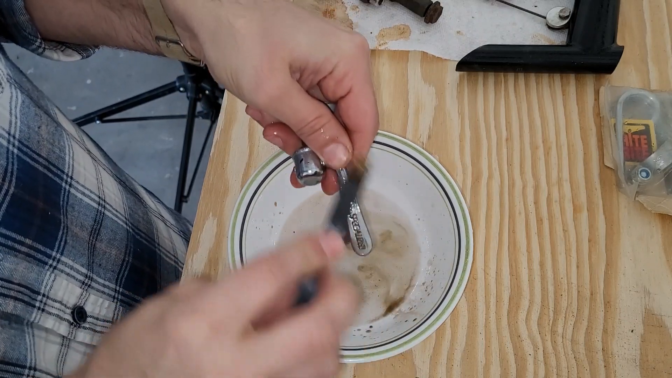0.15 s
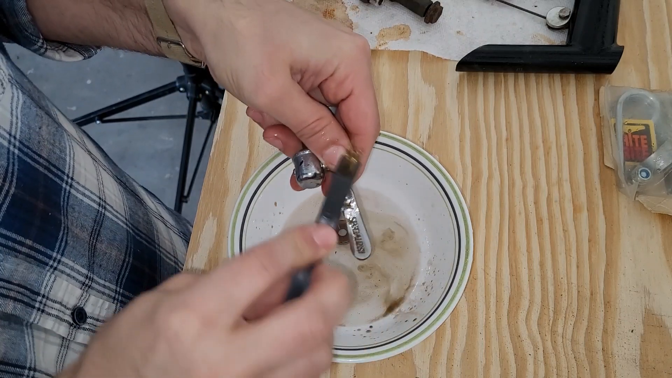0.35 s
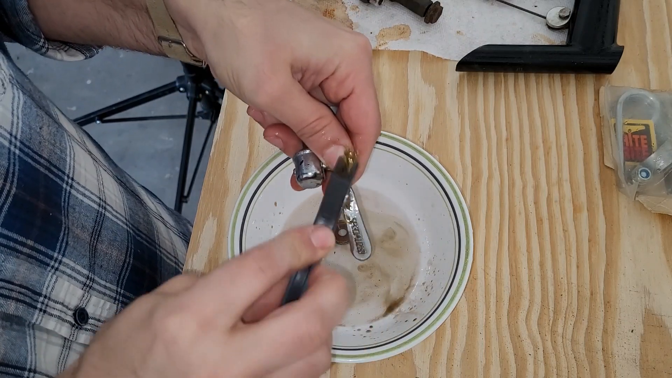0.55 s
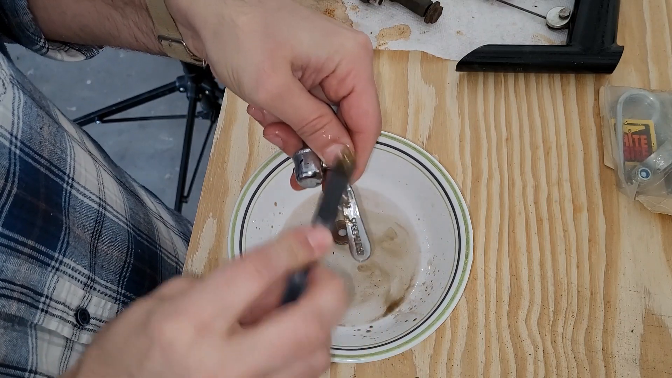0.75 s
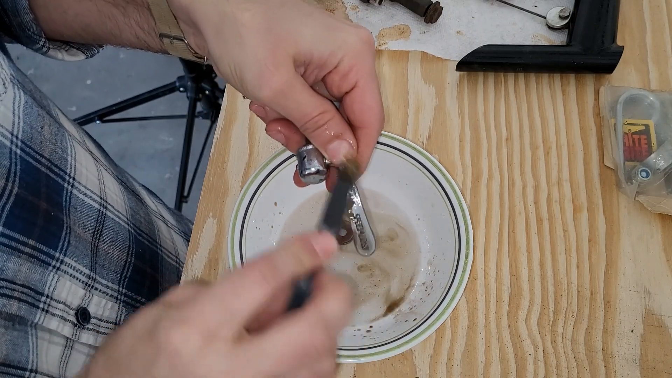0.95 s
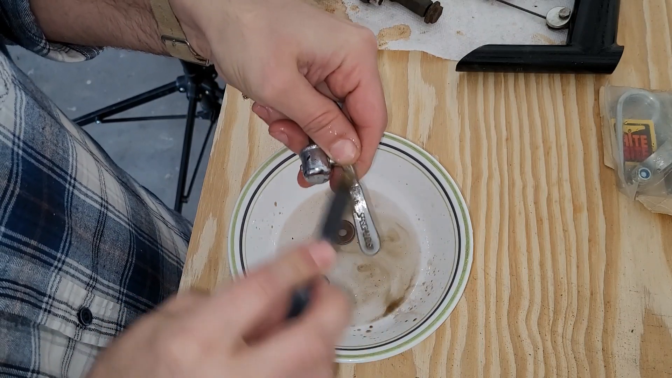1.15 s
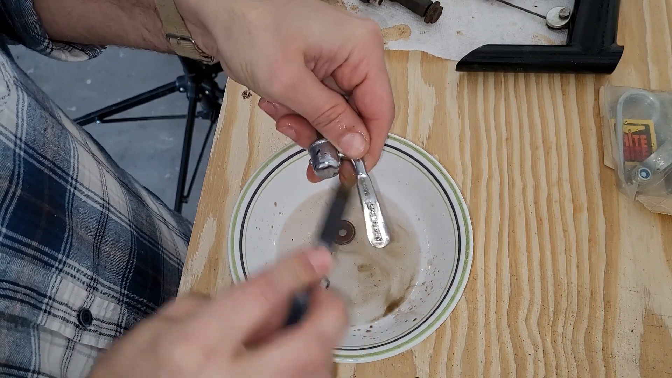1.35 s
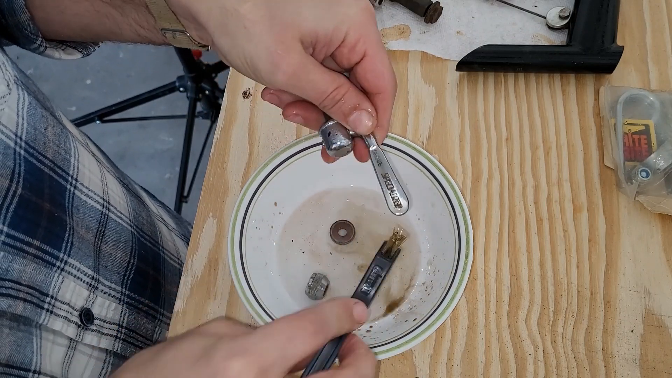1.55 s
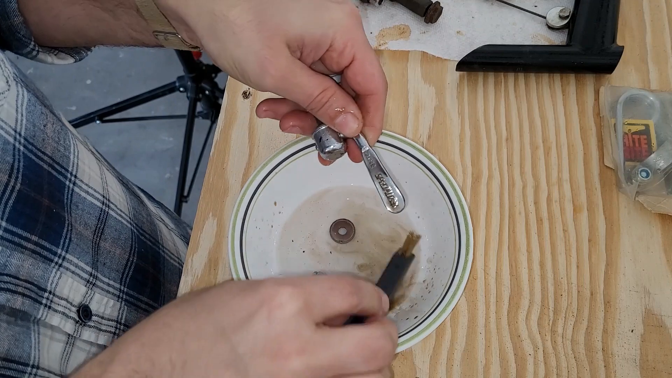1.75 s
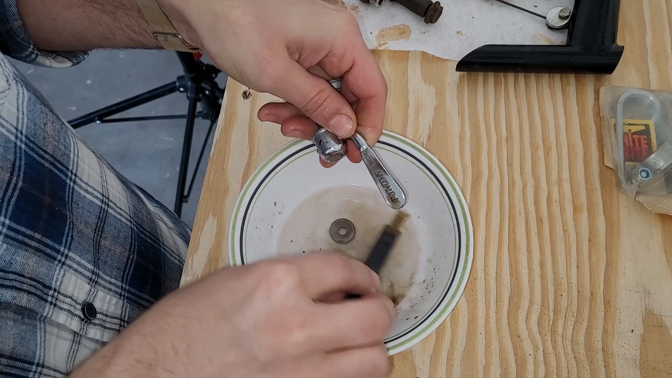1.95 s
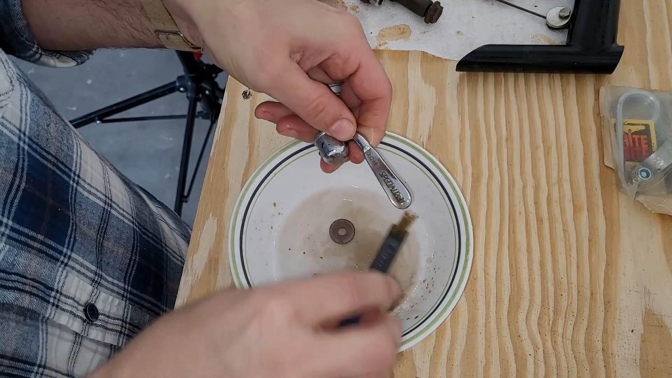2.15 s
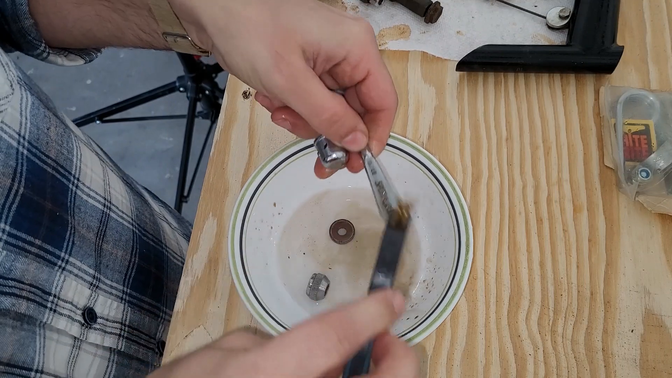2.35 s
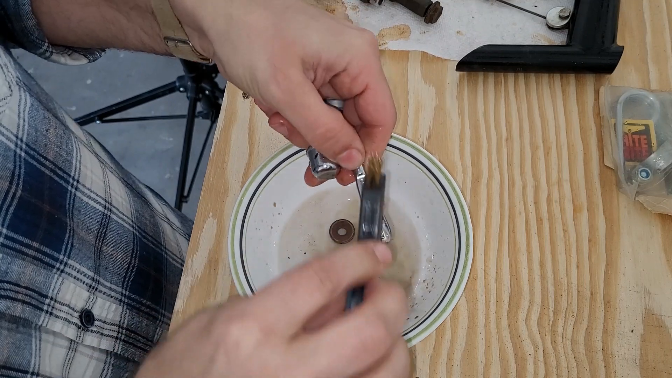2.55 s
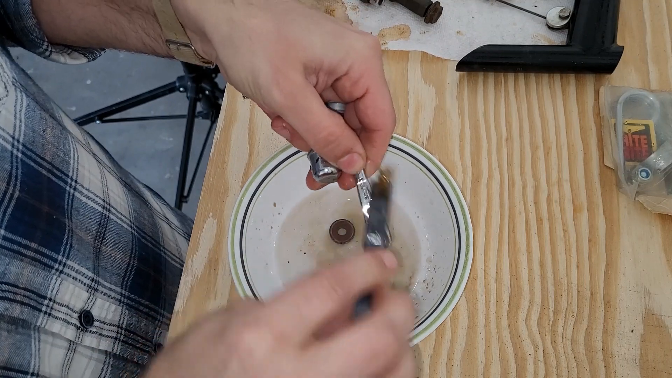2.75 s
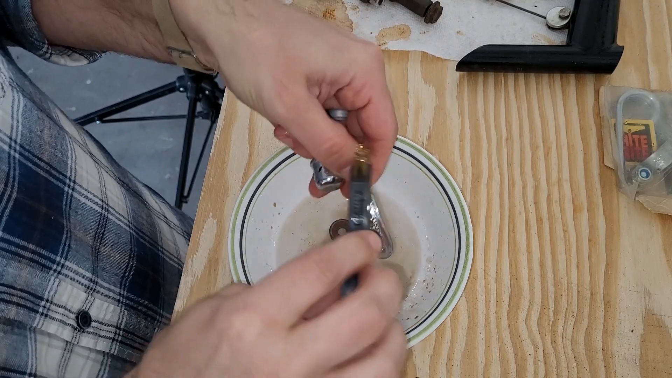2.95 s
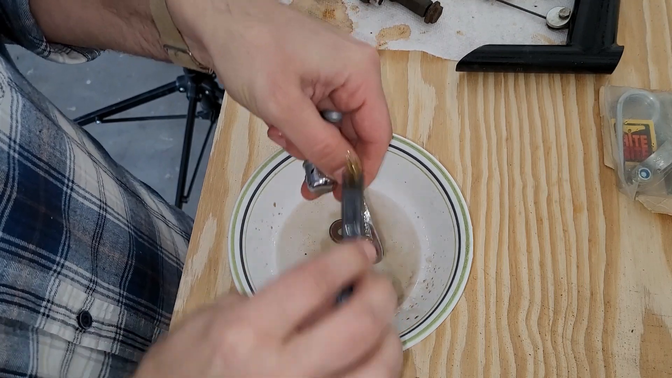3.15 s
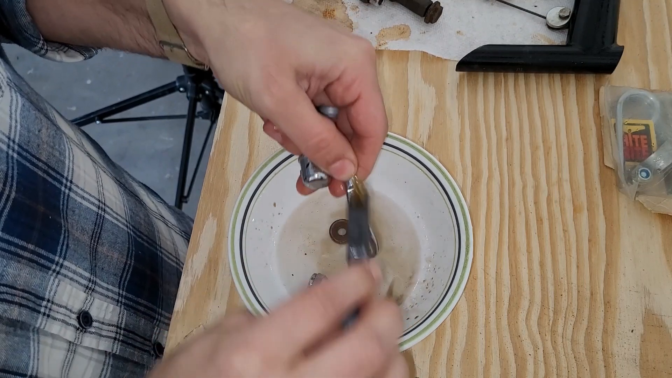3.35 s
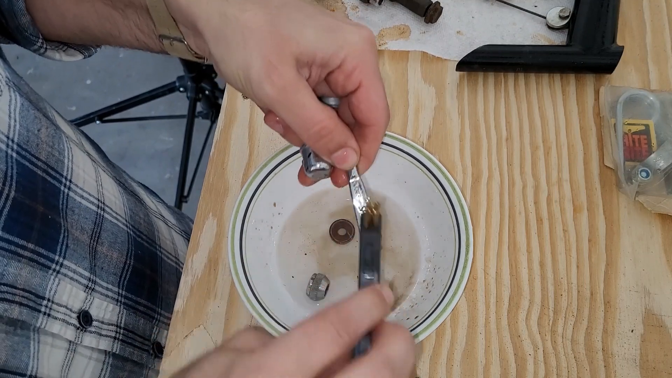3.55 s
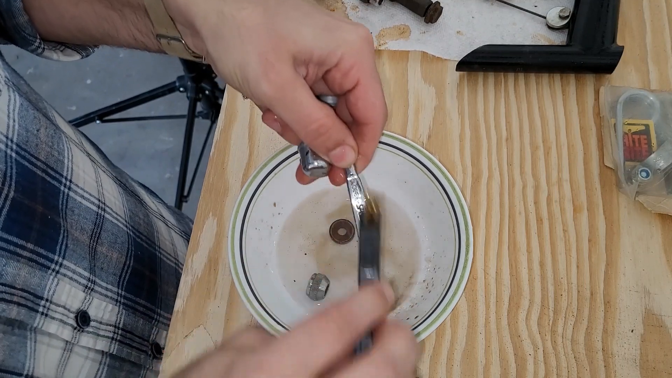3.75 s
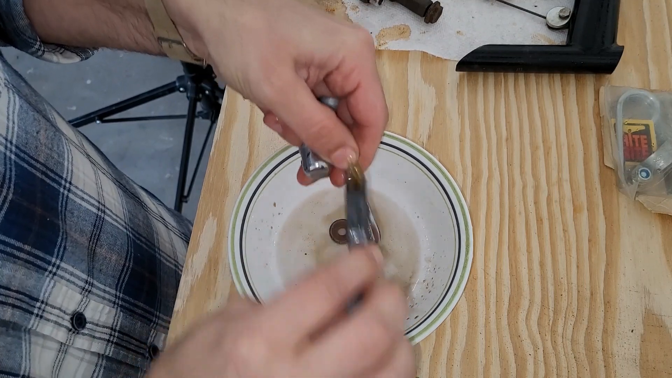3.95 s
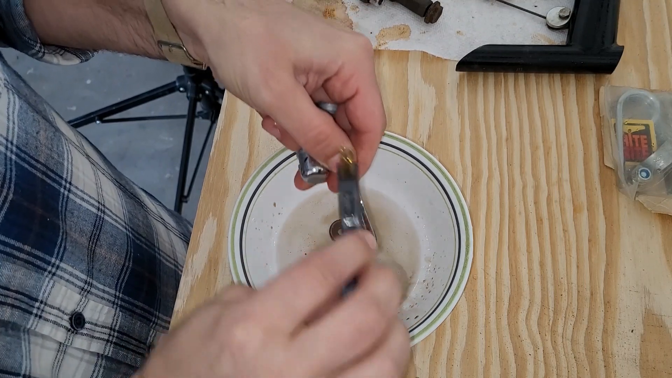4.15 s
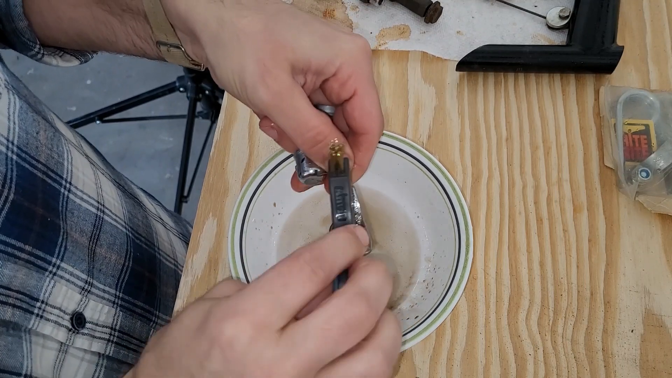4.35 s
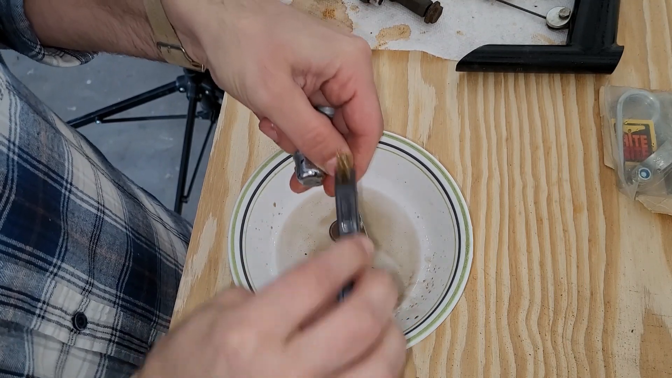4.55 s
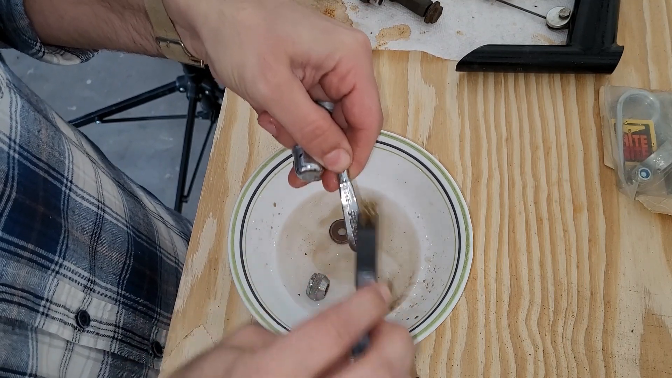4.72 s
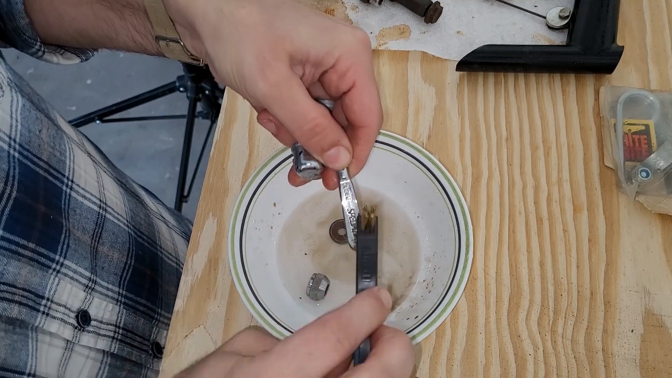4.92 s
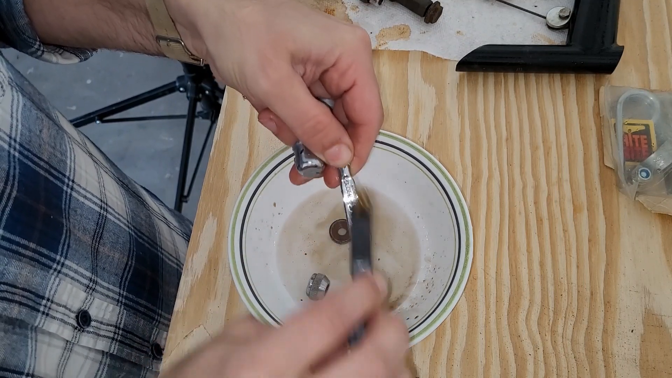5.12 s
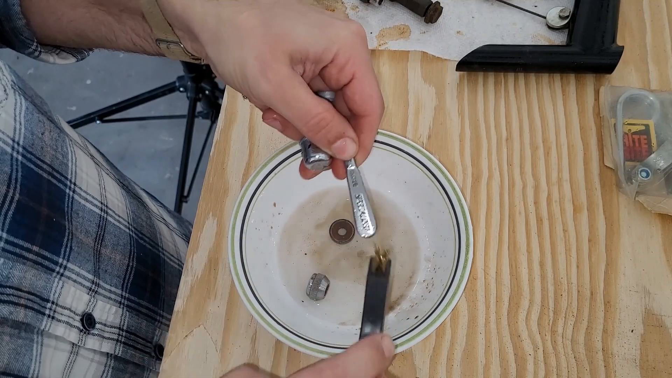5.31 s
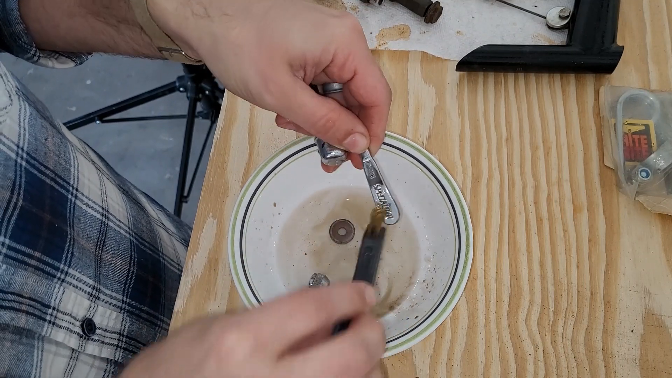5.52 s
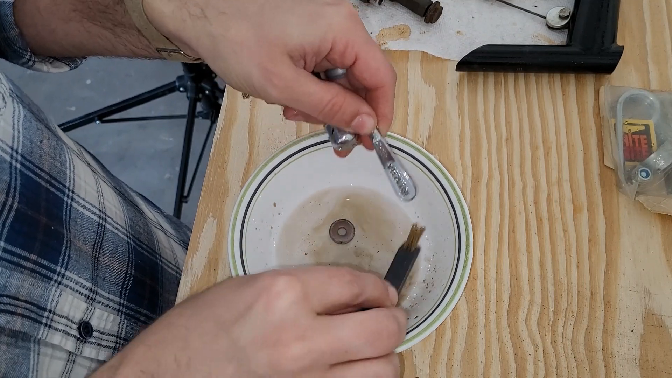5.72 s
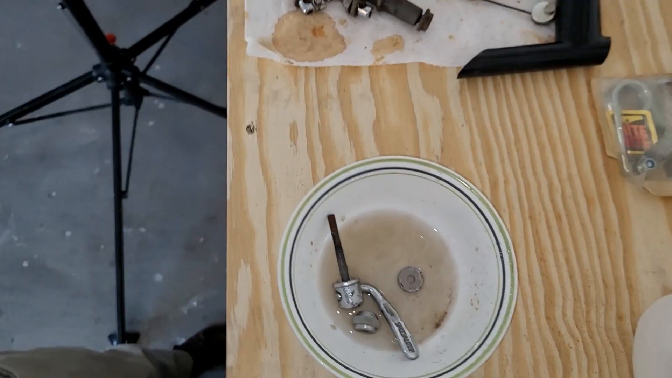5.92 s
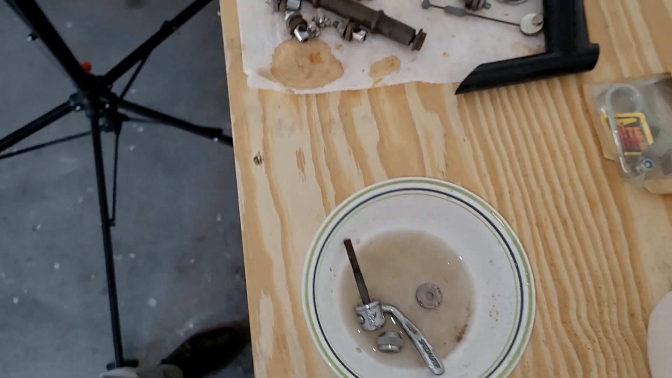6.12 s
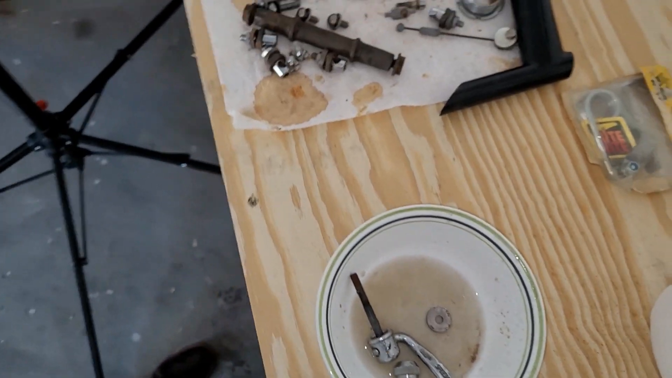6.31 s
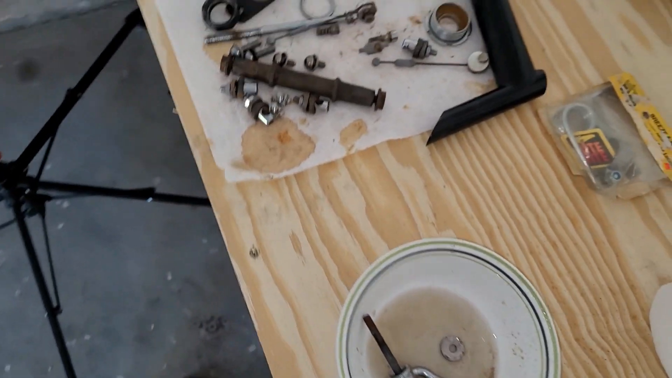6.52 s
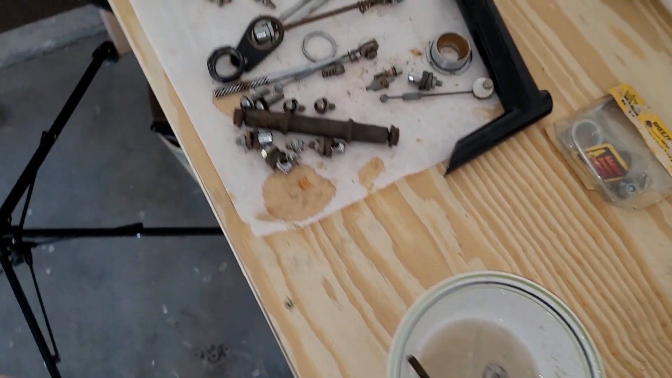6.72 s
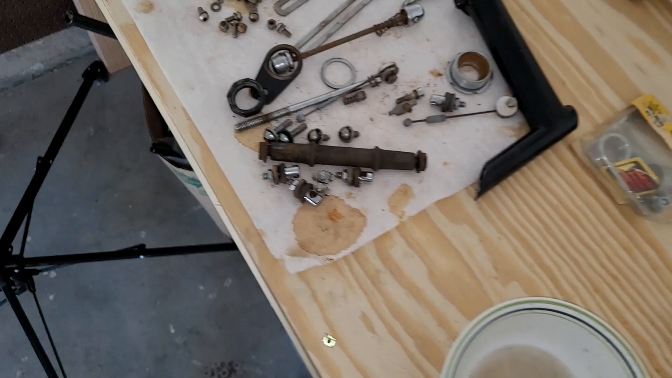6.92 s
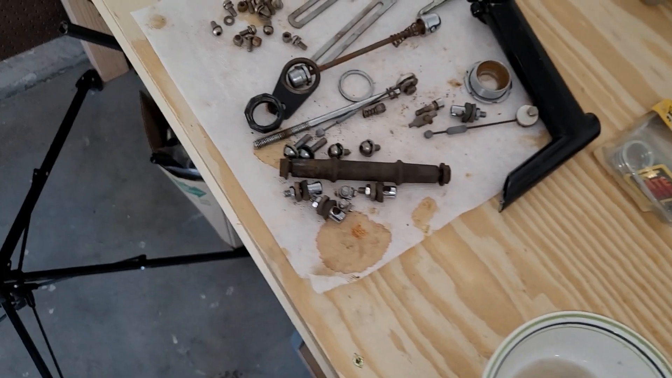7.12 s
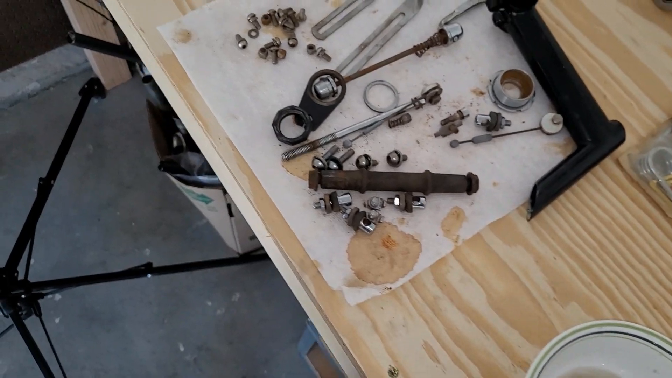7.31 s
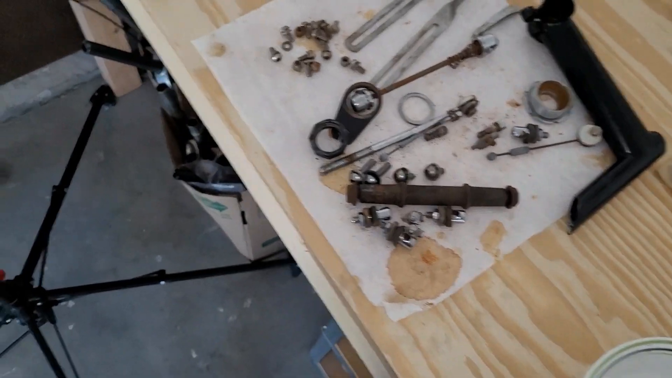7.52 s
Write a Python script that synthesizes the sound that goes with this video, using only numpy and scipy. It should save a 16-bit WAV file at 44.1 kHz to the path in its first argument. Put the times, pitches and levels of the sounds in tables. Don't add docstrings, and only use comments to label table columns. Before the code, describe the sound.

Close to the microphone, a stiff brush scrubs a small steel lever over a bowl, about nine bright, hissing strokes a second with faint metallic ringing. It pauses for a soft wet dip, then scrubs steadily again. The brush drops with a quick bouncing thud. An abrupt cut leaves ventilation hum and someone shuffling past. A bird calls faintly outside twice.

```python
import sys
import numpy as np
from scipy import signal
from scipy.fft import rfft, irfft, next_fast_len
from scipy.io import wavfile
from scipy.ndimage import uniform_filter1d, minimum_filter1d

SR = 44100
rng = np.random.default_rng(int(sys.argv[2]) if len(sys.argv) > 2 else 0)


def decibels_to_gain(level_db):
    exponent = np.asarray(level_db, float) / 20
    return 10 ** exponent


def master_out(mix):
    frames = np.transpose(np.atleast_2d(mix))
    ceiling = np.clip(frames, -1, 1)
    pcm = np.round(ceiling * 32767).astype(np.int16)
    wavfile.write(sys.argv[1], SR, pcm)


N = 333835
T = np.arange(N) / SR
SIDES = np.array([[1], [-1]])
SCENE_CHANGE_S = 5.97

# (frequency [Hz], level [dB per Hz])
AIR_COLOUR = [(12, -35), (20, -20), (53, -7.5), (124, -10), (199, -23), (263, -10.5), (436, -7.5),
              (546, -3.5), (611, -6), (786, -4), (929, -5), (1230, -13), (2040, -26.5), (2340, -41.5),
              (16200, -43)]
# (frequency [Hz], width [Hz], level [dB])
DUCT = [(327, 17, -6), (455.4, 15, 1), (564.3, 12, -2.5), (967, 12, -1.5)]
# (frequency [Hz], likeness [-1 to 1])
ROOM_LIKENESS = [(60, 1), (130, 0.7), (290, 0.45), (640, 0.033), (1410, -0.34), (3100, 0.12),
                 (6820, -0.000067), (15000, 0.045)]
# (time [s], level [dB])
SCENE_FADE = [(0, 0), (5.93, 4), (5.955, -10.5), (5.97, -27), (5.99, 0.5), (8, 5)]
AIR_DB, AIR_SHAKEN_DB = -63.5, -62
EFFORT_S = 0.26

# (start [s], length [s], first pitch [Hz], last pitch [Hz], level [dB])
BIRD = [
    (1.05, .078, 2738, 2722, -51),
    (1.116, .05, 2718, 2714, -54),
    (1.15, .08, 2716, 2712, -61),
    (3.722, .056, 2742, 2728, -51),
    (3.778, .045, 2716, 2710, -52),
    (3.82, .1, 2725, 2725, -63),
]
# (time [s], pitch [Hz], level [dB])
SQUEAK = [(5.285, 15350, -88), (5.33, 15000, -83), (5.36, 15330, -81), (5.4, 15000, -82),
          (5.43, 14350, -84), (5.462, 13550, -88)]

# (frequency [Hz], level [dB per Hz])
THRUM = [(11, -48), (18, -35), (45, 4), (68, 3.5), (85, -5), (135, 2), (148, 2), (172, -45), (190, -37),
         (250, -26), (420, -120)]
# (time [s], level [dB])
LEAN = [(0.0, -51.5), (0.76, -57.5), (0.91, -66), (1.18, -61), (1.35, -64.5), (1.43, -55.5), (1.5, -69),
        (1.79, -54.5), (2.23, -68.5), (3.62, -55), (3.69, -71), (3.73, -52), (4.21, -63.5), (4.3, -56.5),
        (5.76, -61.5), (5.86, -53.5), (5.94, -65.5), (7.57, -93.5)]
# (frequency [Hz], level [dB], 60 dB decay [s])
BOARD = [(123, -6.5, 0.015), (249.4, -1, 0.11), (283, 11, 0.058), (360.5, 13.5, 0.032), (434, 3.5, 0.051),
         (774, -7.5, 0.23)]
# (peak [s], rise [s], fall [s], level [dB])
KNOCKS = [(.3, 0.95, 0.55, -58), (1.28, 1, 0.12, -56.5), (1.84, 0.13, 0.24, -56), (2.07, 0.19, 0.08, -50),
          (2.72, 0.27, 1, -62), (3.82, 0.058, 0.11, -59), (4.68, 0.16, 0.33, -56), (5.25, 0.9, 0.24, -62.5),
          (5.44, 0.2, 0.13, -59), (5.81, 0.036, 0.11, -44), (6.24, 0.07, 1, -58.5)]
# (time [s], level [dB])
WRIST_HUM = [(0, -57), (.5, -68.5), (.85, -57.5), (1.0, -103), (8, -80)]
# (time [s], level [dB])
THUDS = [
    (5.7936, -33),
    (5.8008, -31),
    (5.8165, -34),
    (5.8285, -38),
    (5.8415, -47),
]
# (frequency [Hz], level [dB], 60 dB decay [s])
THUD_MODES = [(317, -3, 0.019), (270, -10.5, 0.05), (526, -11, 0.012), (610, -14, 0.02), (870, -15, 0.017),
              (1110, -19, 0.019), (1370, -21, 0.042), (1770, -27, 0.034)]
BOARD_DB = -66

# (time [s], peak [dB], pan [dB])
TICKS = [(0.5232, -51, 5), (1.2378, -28.5, 3), (2.0565, -25.5, -4), (2.9845, -32.5, 3), (3.8044, -43, 10),
         (5.4797, -55, 2), (5.6276, -54, 7), (5.659, -48.5, 19), (6.159, -60, 3), (6.4954, -53, 6),
         (0.162, -29, 3), (1.246, -31, 7), (6.709, -60.5, 11), (7.3018, -58, -9)]
# (time [s], frequency [Hz], level [dB], 60 dB decay [s])
CLINKS = [(1.635, 3106, -78, 1.1), (1.635, 4861, -83, .25), (1.635, 6955, -78, .25),
          (1.752, 10100, -72, .3), (1.752, 10800, -73, .6), (1.752, 12300, -70, .3), (5.862, 440, -53, .5),
          (6.24, 1771, -64, .3), (1.7, 1670, -76, .9), (5.215, 3160, -70, 1.0), (5.43, 3200, -81, .7),
          (5.485, 3190, -77, .3), (5.555, 3210, -78, .3), (5.28, 9000, -86, .8), (5.285, 12150, -80, .2),
          (5.24, 6400, -82, .5)]

# (frequency [Hz], level [dB per Hz])
RUSTLE_COLOUR = [(900, -16), (1400, -14.5), (1900, -12), (2600, -15), (3600, -11.5), (4800, -13.5),
                 (5700, -12.5), (8000, -13.5), (12200, -14), (16200, -18)]
# (peak [s], rise [s], fall [s], level [dB], slope [dB per octave])
DIPS = [(1.42, 0.017, 0.079, -68, 0), (1.66, 0.067, 0.33, -83, 9), (1.72, .15, 0.22, -79, -4.5),
        (1.756, 0.0063, 0.03, -67, 11), (1.803, .015, 0.025, -64, 0), (1.84, 0.037, 0.11, -61.5, 7),
        (1.89, 0.062, 0.061, -52.5, 0.5), (1.928, 0.084, 0.015, -59, -2), (1.965, 0.016, .05, -65, -1),
        (2.0, 0.058, 0.055, -58.5, -3), (2.075, 0.1, 0.033, -53, -1.5), (2.11, .02, 0.09, -71.5, 0),
        (5.25, 0.011, 0.7, -81.5, -4), (5.6, 0.055, .05, -86, 4), (5.632, 0.025, .05, -74, 3),
        (5.663, 0.02, 0.028, -70, 5), (5.7, .05, 0.07, -82, 8), (5.795, 0.0026, 0.1, -55, 4.5),
        (5.825, 0.024, 0.049, -52.5, 3), (5.87, .05, 0.57, -69, 2.5)]
# (peak [s], rise [s], fall [s], level [dB], slope [dB per octave])
SHUFFLES = [(6.243, 0.012, 0.021, -50.5, -6), (6.254, 0.009, 0.021, -53, -7),
            (6.265, .03, 0.16, -56.5, -5.5), (6.34, .05, 1, -71.5, -6), (6.55, 0.13, 0.21, -65, 1.5),
            (6.9, 0.66, 0.54, -71, -3), (7.194, 0.049, 0.073, -75.5, -10),
            (7.304, 0.024, 0.093, -71.5, -4.5), (7.4, 0.038, 0.47, -71, -4.5), (7.57, .08, .1, -79, -9)]
# (from [s], to [s], modes (frequency [Hz], width [Hz], level [dB]))
BODIES = [
    (1.794, 2.163, [(8950, 260, 0), (10100, 90, -4), (10850, 200, 1), (12300, 260, 1), (7300, 250, -3), (13900, 250, -3)]),
    (5.56, 5.685, [(9800, 350, 6), (7700, 500, 0)]),
    (5.79, 5.967, [(1900, 700, 2), (3700, 360, -4), (5840, 260, -25), (8200, 890, -7), (15400, 500, -9)]),
    (6.238, 6.45, [(1800, 500, -8), (3200, 200, -7), (4400, 900, -8), (6040, 650, -20)]),
    (6.5, 6.8, [(4850, 500, -4), (7900, 300, -6), (11800, 410, -4)]),
    (6.8, 7.106, [(4400, 500, -4), (7690, 300, -8), (11800, 410, -4)]),
    (7.175, 7.245, [(3100, 280, 4.5), (4500, 170, -7)]),
]
# (from [s], to [s], frequency [Hz], width [Hz], depth [0 to
THIN_SPOTS = [
    (6.24, 7.6, 2500, 4600, 0.6),
    (5.82, 5.97, 2600, 530, 0.9),
    (1.855, 1.915, 2650, 970, 1),
    (2.1, 1.9, 2660, 450, .9),
    (1.72, 1.83, 4800, 3900, 1),
]
DIP_PAN_DB, SHUFFLE_PAN_DB = 1.5, 4.5
PATCHY_DB = 1.3

# (start [s], time to full speed [s], length [s], level [dB])
STROKES = [(-0.03, 0.0099, 0.057, -37), (.072, 0.02, 0.081, -35), (.165, 0.066, 0.082, -38),
           (.287, 0.031, 0.07, -37.5), (.383, 0.077, 0.086, -39), (.518, 0.0095, 0.065, -36),
           (.605, 0.088, 0.077, -37.5), (.721, 0.043, 0.067, -37), (.826, 0.066, 0.064, -39),
           (.925, 0.026, 0.072, -38), (1.04, 0.045, 0.065, -37.5), (1.129, 0.031, 0.074, -40.5),
           (1.241, 0.027, 0.072, -41.5), (1.35, 0.034, 0.03, -40.5)]
# (start [s], time to full speed [s], length [s], level [dB])
LAST_STROKES = [(2.475, 0.035, 0.078, -55), (2.576, 0.02, 0.065, -46.5), (2.659, 0.031, 0.064, -43),
                (2.736, 0.073, 0.086, -42.5), (2.876, 0.03, 0.064, -40.5), (3.007, 0.14, 0.075, -35.5),
                (3.135, 0.022, 0.057, -37.5), (3.221, 0.065, 0.1, -40), (3.348, 0.062, 0.087, -39.5),
                (3.475, 0.05, 0.087, -38), (3.6, 0.025, 0.063, -37), (3.715, 0.051, 0.083, -37.5),
                (3.835, 0.037, 0.079, -37.5), (3.953, 0.055, 0.085, -38.5), (4.076, 0.023, 0.076, -37),
                (4.193, 0.043, 0.071, -39.5), (4.304, 0.032, 0.076, -37.5), (4.406, 0.044, 0.078, -38),
                (4.527, 0.029, 0.072, -36.5), (4.628, 0.046, 0.086, -38.5), (4.761, 0.022, 0.069, -37),
                (4.86, 0.04, 0.084, -39), (4.985, 0.02, 0.066, -36), (5.092, 0.046, 0.082, -38),
                (5.18, .012, 0.031, -48)]
# (time [s], level [dB])
DRAG = [
    [(0, -55), (1.2, -53), (1.36, -108), (1.42, -70)],
    [(2.478, -79), (2.5, -83), (2.6, -60), (3.2, -56), (5.17, -53), (5.24, -55), (5.32, -78)],
]
# (time [s], peak [dB])
CATCHES = [(0.077, -18), (0.186, -32), (1.0455, -19), (1.259, -26), (2.595, -30), (3.037, -20.5),
           (3.2505, -32), (3.497, -19), (3.7324, -29), (4.208, -16.5), (4.6558, -26), (0.3092, -38),
           (0.5227, -30), (0.74, -13), (0.9403, -30), (1.155, -27), (1.3778, -44), (2.6708, -22),
           (2.8938, -30), (3.137, -24.5), (3.3772, -17), (3.6074, -22), (3.8576, -19), (3.9903, -26),
           (4.0926, -28), (4.313, -20), (4.4263, -43), (4.532, -22), (4.7721, -33.5), (4.8838, -23),
           (4.9945, -22), (5.112, -32.5)]
# (frequency [Hz], level [dB per Hz])
BRISTLES = [(1300, -11), (1700, -31.5), (2100, -15), (2480, -19), (2900, -14), (3500, -13.5), (4000, -7.5),
            (5200, -1), (7000, 0.5), (8900, -3), (11400, 2.5), (13500, 0.5), (15600, 5.5), (16200, -28)]
# (frequency [Hz], left minus right [dB])
BRISTLE_SIDE = [(1500, 14.5), (3300, 0.5), (4300, 8.5), (5500, 0), (7600, -0.5), (8600, 7.5), (10000, 4.5),
                (12500, 1), (15000, 2)]
# (frequency [Hz], likeness [-1 to 1])
BRISTLE_LIKENESS = [(1500, -0.3), (2500, 0.8), (4000, 0.15), (6400, -0.42), (10000, -0.33), (15000, -0.2)]
# (frequency [Hz], width [Hz], level [dB])
LEVER = [(2082, 60, 2.5), (2465, 26, 0), (2710, 36, 3), (3167, 31, 2.5), (3782, 24, -3), (5110, 39, -2.5),
         (7250, 62, -5), (7960, 200, -7.5), (11180, 150, -11.5), (12020, 290, -5.5)]
# (frequency [Hz], width [Hz], from [s], to [s])
THIN_BANDS = [(2330, 235, 2.5, 4.8), (3500, 490, 2.47, 4.9), (3200, 440, -13, 0.91), (1840, 170, -3.5, 5)]
BITE_DB, RISE_SHAPE, SAG_DB_PER_S, STOP_DB_PER_S = -13.5, 1.35, 85, 683
PULL_SAG_DB_PER_S, PULL_BITE_DB = -12, -3
BRIGHT_DB, BRIGHT_PER_DB, TURN_BRIGHT_DB = 1, 0.13, 0.29
CATCH_DB, CATCH_S = -23, 0.012
LINGER_S = 0.059
LOW_DRIFT_DB = 5


def rms_one(x):
    return x / np.sqrt(np.mean(x ** 2) + 1e-20)


def in_time(rows):
    s, *columns = np.transpose(rows)
    return [np.interp(T, s, c) for c in columns]


def spans(tables):
    rows = []
    for table in tables:
        first, last = table[0], table[-1]
        rows += [(first[0] - .01, -120, *first[2:]), *table, (last[0] + .01, -120, *last[2:])]
    return in_time(rows)


def at_hz(points, hz):
    points_hz, values = np.array(points).T[:2]
    return np.interp(np.log(hz), np.log(points_hz + 1), values)


def drift(rate):
    r = np.exp(-2 * np.pi * rate * 40 / SR)
    slow = signal.lfilter([1], [1, -2 * r, r * r], rng.standard_normal(N // 40 + 2002))[2000:]
    return np.interp(np.arange(N) / 40, np.arange(len(slow)), rms_one(slow))


def bump(peak, rise, fall, level_db):
    before, after = (peak - T) / max(rise, .003), (T - peak) / max(fall, .003)
    return decibels_to_gain(level_db - 20 * np.maximum(before, after)) ** 2


def clicks_at(rows):
    out = np.zeros(N)
    for s, level_db, *_ in rows:
        out[round(s * SR)] = decibels_to_gain(level_db)
    return out


def ring(clicks, hz, t60):
    r, w = decibels_to_gain(-60 / (t60 * SR)), 2 * np.pi * hz / SR
    return signal.lfilter([0, np.sin(w)], [1, -2 * r * np.cos(w), r * r], clicks + 1e-18)


def resonance(x, hz, width):
    r = np.exp(-np.pi * width / SR)
    top = np.array([1, 0, -1]) * (1 - r * r) / 2
    return signal.lfilter(top, [1, -2 * r * np.cos(2 * np.pi * hz / SR), r * r], x)


def grains(per_s, spread_db, last_s, hiss):
    sizes = (rng.random(N) < per_s / SR) * decibels_to_gain(spread_db * np.minimum(rng.exponential(1, N), 4))
    r = np.exp(-1 / (last_s * SR))
    return rms_one(signal.lfilter([1], [1, -r], sizes)) + hiss


def coloured(spectrum, centres_hz, band_db, grain=1, balance=((20, 0), (2e4, 0)), likeness=ROOM_LIKENESS):
    size = next_fast_len(N)
    hz = np.maximum(np.arange(size // 2 + 1) * SR / size, 1)
    mid, side = rfft(grain * rng.standard_normal((2, N)), size)
    alike = np.clip(at_hz(likeness, hz), -1, 1)
    both = np.sqrt(1 + alike) * mid + SIDES * np.sqrt(1 - alike) * side
    both = both * decibels_to_gain(at_hz(spectrum, hz) + SIDES * at_hz(balance, hz) / 2)
    both = both * (hz > spectrum[0][0]) * (hz < spectrum[-1][0])
    both = both / np.sqrt(np.mean(irfft(both, size) ** 2))
    out = np.zeros((2, N))
    for centre, row in zip(centres_hz, np.eye(len(centres_hz))):
        share = np.interp(np.log(hz), np.log(centres_hz), row)
        out += decibels_to_gain(band_db(centre)) * irfft(both * share, size)[:, :N]
    return out


def air():
    noise = coloured(AIR_COLOUR, [60, 300, 1500], lambda hz: 1.1 * drift(15.0))
    duct = sum(decibels_to_gain(peak_db) * resonance(noise, hz, width) for hz, width, peak_db in DUCT)
    effort = np.sqrt(uniform_filter1d(strokes()[0], round(EFFORT_S * SR)).clip(0))
    level = np.sqrt(decibels_to_gain(AIR_DB) ** 2 + decibels_to_gain(AIR_SHAKEN_DB) ** 2 * effort / effort.max())
    return level * decibels_to_gain(2.0) * (noise + duct)


def bird():
    notes = np.zeros(N)
    for start, length, first_hz, last_hz, level_db in BIRD:
        part = np.clip((T - start) / length, 0, 1)
        phase = 2 * np.pi * np.cumsum(first_hz + (last_hz - first_hz) * part) / SR
        notes += decibels_to_gain(level_db) * np.sin(np.pi * part ** 1.6) * np.sin(phase)
    echoes = rng.standard_normal((2, 12000)) * decibels_to_gain(-60 * T[:12000] / .8 - 37)
    return .7 * notes + .6 * signal.fftconvolve(notes[None], echoes)[:, :N]


def bench():
    thrum = coloured(THRUM, [30, 70, 150], lambda hz: 2.2 * drift(5.2), balance=((20, -9.0), (125, 0.0)))
    thrum = thrum + decibels_to_gain(2.5) * resonance(thrum, 69, 9)
    thrum = decibels_to_gain(in_time(LEAN)[0] - 2.5) * thrum
    touch = rng.standard_normal((2, N)) * decibels_to_gain([[0], [-7]])
    mid, side = rms_one(sum(decibels_to_gain(level_db) * ring(touch, hz, t60) for hz, level_db, t60 in BOARD))
    board = np.sqrt(decibels_to_gain(BOARD_DB) ** 2 + sum(bump(*row) for row in KNOCKS))
    touched = board * decibels_to_gain(-3.0) * (mid + SIDES * side)
    hum = decibels_to_gain(in_time(WRIST_HUM)[0]) * rms_one(ring(touch[0], 217, 0.83))
    soft = 2.02 * resonance(clicks_at(THUDS), 341, 173)
    thuds = -sum(decibels_to_gain(level_db) * ring(soft, hz, t60) for hz, level_db, t60 in THUD_MODES)
    return thrum + touched + thuds + hum


def rustle():
    power, slope_db, pan_db = 1e-14, 0, 0
    for rows, pan in ((DIPS, DIP_PAN_DB), (SHUFFLES, SHUFFLE_PAN_DB)):
        for *touch, slope in rows:
            same_scene = (T < SCENE_CHANGE_S) == (touch[0] < SCENE_CHANGE_S)
            rub = bump(*touch) * same_scene
            power = power + rub
            slope_db = slope_db + rub * slope
            pan_db = pan_db + rub * pan
    slope_db, pan_db = slope_db / power, pan_db / power
    sound = coloured(RUSTLE_COLOUR, np.geomspace(1400, 15000, 5),
                     lambda hz: slope_db * np.log2(hz / 7000) + PATCHY_DB * drift(21),
                     grains(890, 1.2, 0.00037, 4.4))
    sound = sound * np.sqrt(power) * decibels_to_gain(2.0 + SIDES * pan_db / 2)
    out = sound.copy()
    for first, last, modes in BODIES:
        part = slice(round(first * SR), round(last * SR))
        for hz, width, peak_db in modes:
            uneven_db = rng.normal(0, 2.5, 12)
            uneven_db[-1] -= 12
            uneven_db = np.interp(T[part], np.linspace(first, last, 12), uneven_db)
            out[:, part] += decibels_to_gain(peak_db + uneven_db + 5) * resonance(sound[:, part], hz, width)
    for first, last, hz, width, depth in THIN_SPOTS:
        passing = np.sin(np.pi * np.clip((T - first) / (last - first), 0, 1)) ** .5
        out = out - np.clip(depth, 0, 1) * passing * resonance(out, hz, width)
    return out


def squeak():
    hz, level_db = in_time(SQUEAK)
    level = decibels_to_gain(level_db - 3 + 4.5 * drift(44)) * (T > SQUEAK[0][0]) * (T < SQUEAK[-1][0])
    return level * np.sin(2 * np.pi * np.cumsum(hz) / SR)


def ticks():
    out = np.zeros((2, N))
    high = signal.butter(2, 4000, "high", fs=SR, output="sos")
    bursts = signal.sosfilt(high, rng.standard_normal((len(TICKS), 2, 600)))
    for (s, peak_db, pan_db), noise in zip(TICKS, bursts):
        crack = noise * np.exp(-T[:600] / 0.0016)
        out[:, round(s * SR):][:, :600] += decibels_to_gain(peak_db - 9.5 + SIDES * pan_db / 2) * crack
    return out


def clinks():
    out = np.zeros((2, N))
    t = T[:30000]
    for s, hz, level_db, t60 in CLINKS:
        rubbed = .45 * rms_one(ring(rng.standard_normal((2, 30000)), hz, 0.3))
        pure = 1.25 * np.sin(2 * np.pi * hz * t) * np.minimum(t / .01, 1)
        out[:, round(s * SR):][:, :30000] += (rubbed + pure) * decibels_to_gain(level_db - 60 * t / t60)
    return out


def strokes():
    power, bright = decibels_to_gain(spans(DRAG)[0]) ** 2, np.zeros(N)
    for k, (start, rise, length, level_db) in enumerate(STROKES + LAST_STROKES):
        near = slice(max(round(start * SR), 0), round((start + length + 0.073) * SR))
        t = T[near] - start
        pull = k % 2
        speed_db = (BITE_DB + PULL_BITE_DB * pull) * np.clip(1 - t / rise, 0, 1) ** RISE_SHAPE
        speed_db -= (SAG_DB_PER_S + PULL_SAG_DB_PER_S * pull) * np.clip(t - rise, 0, 1)
        speed_db -= STOP_DB_PER_S * np.clip(t - length, 0, 1)
        power[near] += decibels_to_gain(level_db + speed_db) ** 2
        bright[near] = BRIGHT_DB + BRIGHT_PER_DB * (level_db + 45.5) + TURN_BRIGHT_DB * (-1) ** k
    for s, peak_db in CATCHES:
        near = slice(round(s * SR), round((s + .06) * SR))
        power[near] += decibels_to_gain(peak_db + CATCH_DB) ** 2 * np.exp((s - T[near]) / CATCH_S)
    return power, bright


def bowl_echo(x, depth_s, wander_s, share):
    late = []
    for k, side in enumerate(x):
        delay_s = depth_s * (1 + 0.3184 * k) + wander_s * drift(3.02)
        late.append(np.interp(T - delay_s, T, side))
    return (x + share * np.array(late)) / np.sqrt(1 + share ** 2)


def brush():
    power, bright = strokes()
    bright = uniform_filter1d(bright, size=400)
    slips = rms_one(grains(90, 3.1, 0.035, 27.0))
    hiss = coloured(BRISTLES, np.geomspace(2000, 15000, 8),
                    lambda hz: bright * np.log2(hz / 9000) + 0.62 * drift(4.4),
                    grains(5000, 1.5, 0.00073, 1.5), BRISTLE_SIDE, BRISTLE_LIKENESS)
    sound = hiss.copy()
    for hz, width, peak_db in LEVER:
        uneven_db = LOW_DRIFT_DB * (hz < 4000) * drift(10.4)
        sound += decibels_to_gain(peak_db + uneven_db) * resonance(hiss, hz, width)
    for hz, width, first, last in THIN_BANDS:
        depth = np.clip(.68 + .22 * drift(9), 0, 1) * (T > first) * (T < last)
        sound = sound - depth * resonance(sound, hz, width)
    sound = slips * bowl_echo(sound, .0012, 0.000184, 1.0)
    low = signal.sosfilt(signal.butter(4, 3500, fs=SR, output="sos"), sound)
    lingering = uniform_filter1d(power, round(LINGER_S * SR)).clip(0)
    return np.sqrt(power) * (sound - low) + np.sqrt(lingering) * low


def scene():
    return air() + bird() + bench() + rustle() + squeak() + ticks() + clinks() + brush()


def masked_out(x, margin_db, slope_db, low_hz, busy_db, jitter_db, count=7):
    hz, times, frames = signal.stft(x, SR, nperseg=2048, noverlap=1536)
    band, starts_hz = np.arange(len(hz)) // count, hz[::count]
    power = np.add.reduceat((abs(frames) ** 2).sum(axis=0), np.arange(0, len(hz), count), axis=0)
    treble = uniform_filter1d(power[starts_hz > 2600].sum(axis=0), size=6)
    treble_db = 10 * np.log10(treble + 1e-20)
    spare_db = np.clip(busy_db - treble_db, 0, 20) + 5 * (times > SCENE_CHANGE_S)
    frame = np.arange(power.shape[1]) // 2
    power = uniform_filter1d(power, size=3, axis=1)[:, 2 * frame] + 1e-20
    spread = decibels_to_gain(-slope_db * abs(starts_hz[:, None] - starts_hz) / 1000) ** 2
    weight = np.where(starts_hz < low_hz, .15, 1)[:, None]
    mask = spread @ (power * weight) / spread.sum(axis=1, keepdims=True)
    neighbours = np.roll(power, 2, axis=0) + np.roll(power, -2, axis=0)
    tones = np.clip(power - 5 * neighbours, 0, 1) * (starts_hz > 2000)[:, None]
    mask += np.max([np.roll(tones, k, axis=0) * decibels_to_gain(-2 - .6 * k) ** 2 for k in range(2, 8)], axis=0)
    luck_db = jitter_db * rng.standard_normal(power.shape)[:, frame]
    wide = uniform_filter1d(rng.standard_normal(power.shape), size=2, axis=1)
    wide = uniform_filter1d(wide, size=2, axis=0)[:, frame]
    luck_db += 2 * rms_one(wide) * (starts_hz < 3800)[:, None]
    kept = np.clip(10 * np.log10(power / mask) + margin_db + spare_db + luck_db, 0, 1)
    kept = minimum_filter1d(kept, size=4, axis=1)
    kept[starts_hz < low_hz] = 1
    frames = frames * kept[band] * (hz < 15960)[:, None]
    return signal.istft(frames, SR, nperseg=2048, noverlap=1536)[1][:, :N]


def band_limit(x):
    return signal.sosfilt(signal.butter(12, 15990, fs=SR, output="sos"), x)


def record(dry):
    thinned = masked_out(dry, margin_db=8.6, slope_db=9.0, low_hz=1300, busy_db=-63.5, jitter_db=3.6)
    mix = thinned * decibels_to_gain(in_time(SCENE_FADE)[0])
    return band_limit(mix)


dry = scene()
out = record(dry)
master_out(out)
```